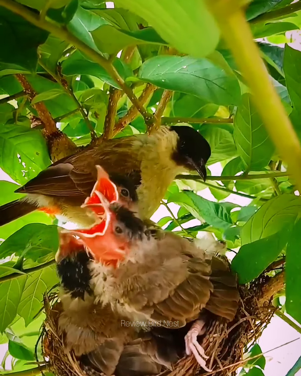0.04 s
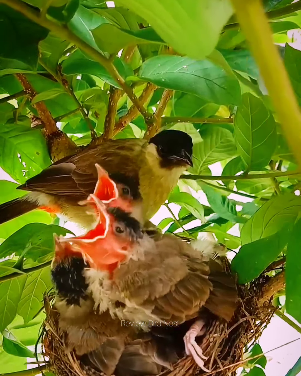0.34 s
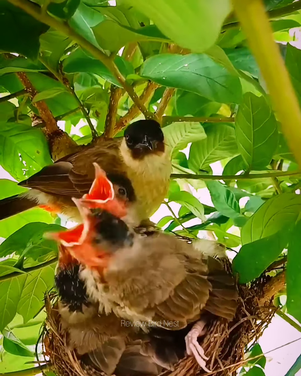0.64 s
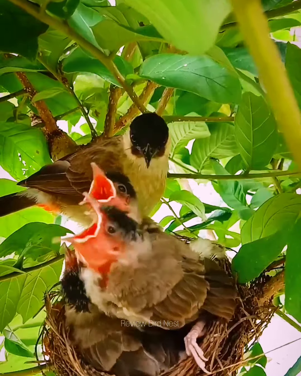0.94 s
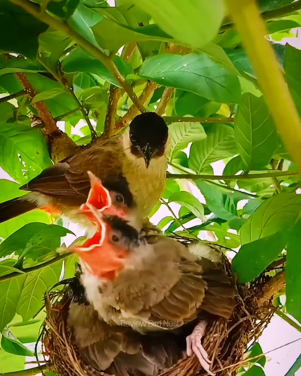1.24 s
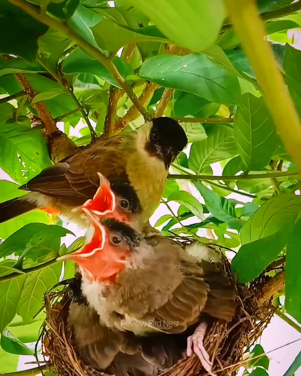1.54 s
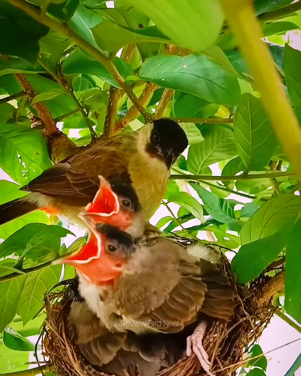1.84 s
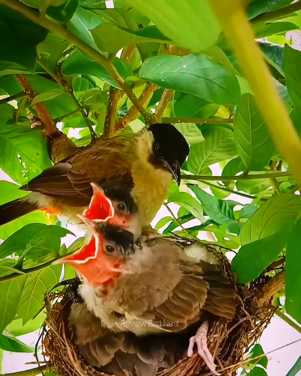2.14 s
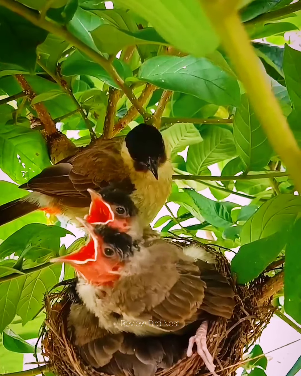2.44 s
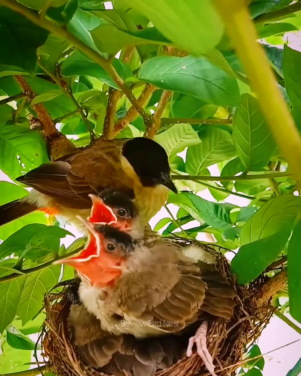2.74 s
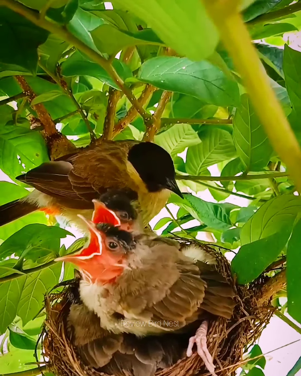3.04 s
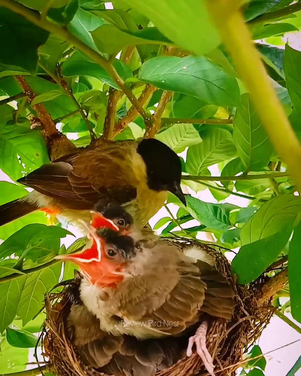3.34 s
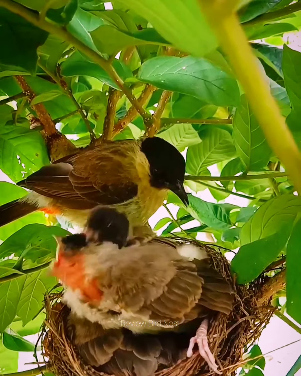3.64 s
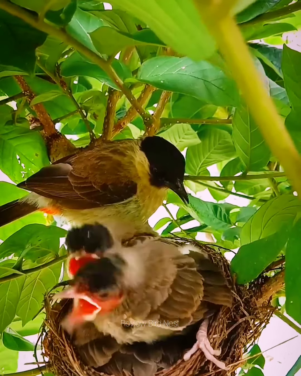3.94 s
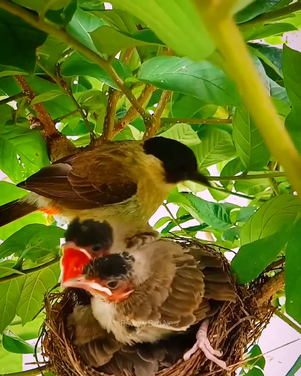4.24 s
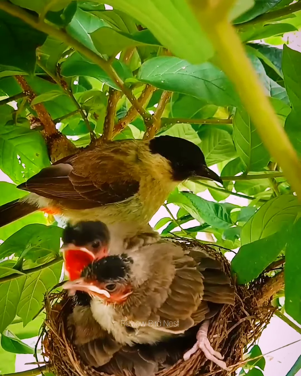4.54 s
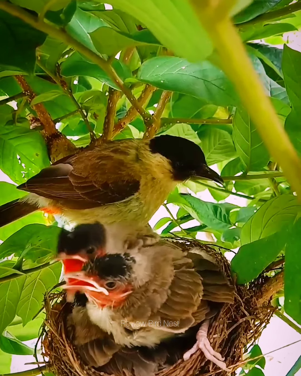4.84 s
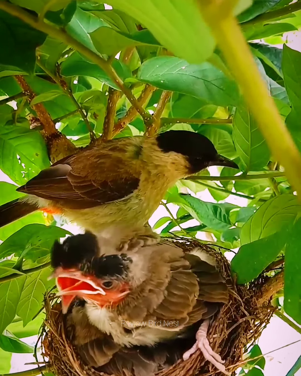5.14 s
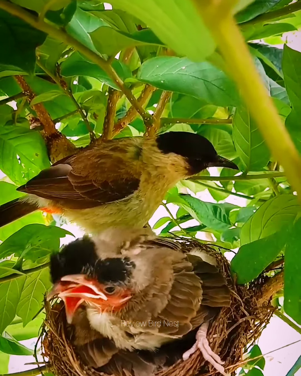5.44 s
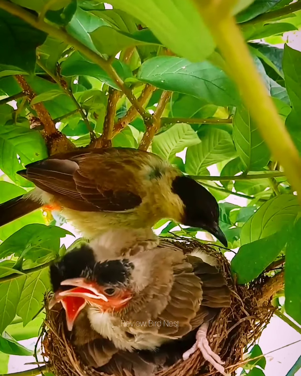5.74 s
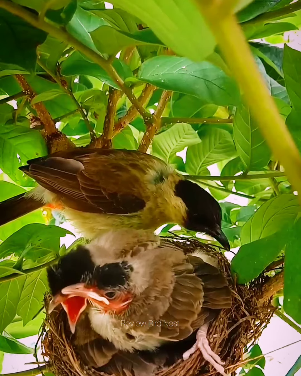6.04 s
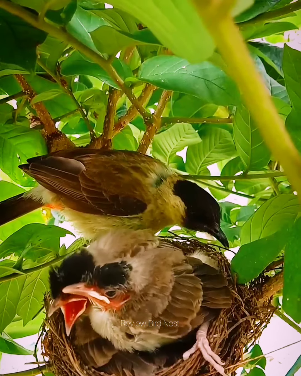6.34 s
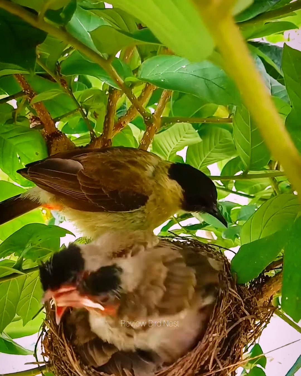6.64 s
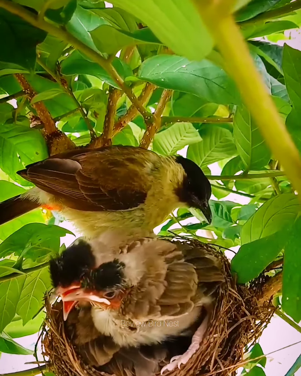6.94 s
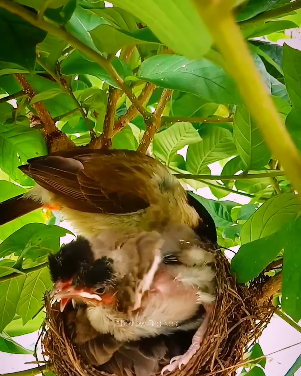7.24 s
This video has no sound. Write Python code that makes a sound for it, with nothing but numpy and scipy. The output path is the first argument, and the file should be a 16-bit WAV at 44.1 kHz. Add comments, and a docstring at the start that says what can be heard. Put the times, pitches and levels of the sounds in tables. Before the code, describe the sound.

Nestlings beg from a nest in a leafy bush, close to the microphone. About twelve short, high, squeaky calls follow one another steadily, most opening with tiny pips and a thin squeal before breaking into a fast, slightly raspy trill that sinks in pitch. The birds' movements thud softly through the branch, mostly in the first half, then settle. A steady bright hiss lies behind.

```python
"""Squeaky begging calls of nestlings, twelve overlapping rounds, close to the microphone in a leafy bush.
Most open with pips and a thin squeal, then break into a fast trill that sinks in pitch. The two sides
of the syrinx make a high and a low voice, both bright in tone and echoed by the leaves.
The birds' movements thud softly through the branch; a steady bright background hiss lies behind.
The recorder's gain control ducks on the loud calls."""
import sys
import numpy as np
from scipy import signal
from scipy.fft import rfft, irfft, next_fast_len
from scipy.io import wavfile
from scipy.ndimage import uniform_filter1d, minimum_filter1d

SR = 44100
rng = np.random.default_rng(int(sys.argv[2]) if len(sys.argv) > 2 else 0)


def wrap_up_sound(samples):
    """Save the sound to the file named by the first command line argument, as 16-bit audio."""
    columns = np.atleast_2d(samples).T
    # keep every value between -1 and 1, then stretch to whole-number steps
    tamed = np.clip(columns, -1, 1)
    steps = np.round(tamed * 32767).astype(np.int16)
    wavfile.write(sys.argv[1], SR, steps)


N = 325899
TIME = np.arange(N) / SR

# soft bumps of the birds on nest and branch: (time [s], relative level [dB])
NEST_BUMPS = [(0.177, -29), (0.261, -19.5), (0.449, -23.5), (.679, -25), (.818, -23.5), (.88, -21.5),
              (1.288, -29.5), (1.388, -17.5), (1.856, -24), (2.443, -24), (2.559, -24), (2.692, -16),
              (2.743, -21), (2.792, -22.5), (2.87, -25), (2.984, -14.5), (3.172, -22), (3.236, -21.5),
              (3.432, -22), (3.51, -28), (3.567, -24), (3.844, -26), (3.996, -30), (4.122, -31),
              (4.723, -35), (4.975, -32), (5.344, -37)]
# tone colour of the calls, bright from 3 to 7 kHz, dull above 8 kHz: (frequency [Hz], gain [dB])
VOICE_COLOUR = [(1500, -28), (2650, -14), (3050, 2.5), (3700, 3), (4350, 10), (4750, 7.5), (5400, 10.5),
                (5900, 10.5), (6600, -2.5), (7200, 6), (7900, -13.5), (8600, -28), (9350, -16),
                (10300, -33), (16000, -34)]


def from_db(db):
    """Decibels to gain."""
    return 10 ** (np.asarray(db) / 20)


def add(track, start_s, sound):
    """Mix a sound into the track from the given time."""
    at = int(start_s * SR)
    track[at:at + len(sound)] += sound[:N - at]


def coloured(x, spectrum):
    """Filter by a smooth outline of (frequency [Hz], gain [dB])."""
    hz, db = np.transpose(spectrum)
    size = next_fast_len(len(x) + 256, True)
    bin_hz = np.maximum(np.fft.rfftfreq(size, 1 / SR), 1)
    gain = from_db(np.interp(np.log(bin_hz), np.log(hz), db))
    return irfft(rfft(x, size) * gain, size)[:len(x)]


def noise(spectrum):
    """Coloured noise of rms 1."""
    x = coloured(rng.standard_normal(N), spectrum)
    return x / x.std()


def wander(size, hz):
    """Random motion up to the given rate, spread near 1."""
    knots = rng.standard_normal(1024)
    return np.interp(2 * hz * TIME[:size], np.arange(len(knots)), knots)


def background(wash_db=-31.5, waver_db=0.56, hiss_db=-31.5):
    """A distant wash that wavers a little, under a steady bright hiss."""
    # distant wash: (frequency [Hz], relative density [dB])
    wash_spectrum = [(20, -41.5), (50, -21), (120, -14.5), (300, -15), (520, -8), (680, -11), (920, -5),
                     (1080, -11.5), (1260, 0.5), (1350, -15.5), (1440, -57), (1700, -55)]
    # steady bright background hiss, dipping at 6.6 kHz and falling away above 8 kHz:
    # (frequency [Hz], relative density [dB])
    hiss_colour = [(1200, -59), (1450, -10), (1600, -3), (2300, 1.5), (3000, -1), (4300, -1), (4900, -3.5),
                   (5900, 4), (6600, -6), (7200, -1), (7950, -13), (8500, -27), (9500, -45), (14000, -44),
                   (15000, -69)]
    wash = from_db(wash_db + waver_db * wander(N, hz=2.3)) * noise(wash_spectrum)
    return wash + from_db(hiss_db) * noise(hiss_colour)


def branch_sway(jostle_db=-43, settle_from_s=2.1, settle_db_per_s=7.5, stir_db=-13, stir_db_per_s=55):
    """The branch rumbles as the nestlings jostle, then slowly settles; every bump stirs it up."""
    # rumble of the swaying branch: (frequency [Hz], relative density [dB])
    rumble_spectrum = [(20, -34.5), (50, -15.5), (90, -2), (140, -12), (200, -14.5), (270, -24), (600, -84)]
    jostle = from_db(jostle_db - settle_db_per_s * np.maximum(TIME - settle_from_s, 0))
    stirred_power = np.zeros(N)
    for start, db in NEST_BUMPS:
        add(stirred_power, start, from_db(db + stir_db - stir_db_per_s * TIME[:SR]) ** 2)
    sway = uniform_filter1d(np.sqrt(jostle ** 2 + stirred_power), size=900)
    return sway * noise(rumble_spectrum)


def branch_thuds(gain_db=-3, push_s=0.0084):
    """Soft pushes set the branch ringing, its modes a little different in strength and pitch each time."""
    # modes of the loaded branch: (frequency [Hz], relative level [dB], time to fall 60 dB [s])
    modes = [(76.2, -4.5, 0.52), (95.7, 9, 0.14), (121.4, 3.5, 0.24), (192, 4, 0.084)]
    thuds, t = np.zeros(N), TIME[:SR // 4]
    onset = 1 - np.exp(-t / push_s)
    for start, db in NEST_BUMPS:
        ring = np.zeros(len(t))
        for (hz, mode_db, t60), uneven, detune in zip(modes, *rng.standard_normal((2, len(modes)))):
            decay = from_db(mode_db + 2 * uneven - 60 * t / t60)
            ring += decay * np.sin(2 * np.pi * hz * (1 + 0.11 * detune) * t)
        add(thuds, start, from_db(db + gain_db) * onset * ring)
    return thuds


def foliage(calls, tail_db=-27, t60=0.16):
    """Near leaves send quick echoes to the microphone; farther twigs scatter a short, faint tail."""
    # reflections off the near leaves: (delay [s], level [dB])
    leaf_echoes = [(.0017, -38.5), (.0043, -12.5), (.0079, -12.5)]
    near = sum(from_db(db) * np.interp(TIME - delay, TIME, calls) for delay, db in leaf_echoes)
    t = TIME[:SR // 4]
    scatter = rng.standard_normal(len(t)) * from_db(-60 * t / t60)
    tail = signal.fftconvolve(calls, scatter / np.linalg.norm(scatter))[:N]
    return calls + near + from_db(tail_db) * tail


def envelope(size, db, swell_db, attack_s, release_s, arch_db):
    """Attack, a slightly arched hold that swells or fades evenly, release."""
    since, along = TIME[:size], np.linspace(-.5, .5, size)
    ramps = np.minimum(since / attack_s, 1) * np.minimum(since[::-1] / release_s, 1)
    hold_db = db + swell_db * along + arch_db * np.cos(2 * np.pi * along)
    return np.sin(np.pi / 2 * ramps) * from_db(hold_db)


def voiced(source):
    """Give a note the calls' bright colour and even out its loudness, keeping the fast throb."""
    note = coloured(source, VOICE_COLOUR)
    return note / np.sqrt(uniform_filter1d(note * note, size=1100) + 0.054)


def syrinx(duration_s, pitches, trill_hz, swing_hz, rough, jitter_hz=290, flutter_db=8, flutter_hz=800,
           throb=1.5, rate_spread=0.12, swing_spread=0.506, slowing=0.13, droop_hz=450, droop_s=0.00674):
    """Phase, strength and pitch sag of a gliding, trilled note; roughness scales all its random motion."""
    size = int(max(duration_s, .01) * SR)
    along, left_s = np.linspace(0, 1, size), TIME[:size][::-1]
    # the pitch droops and the trill slows as the push gives out
    arch = np.polyval(np.polyfit([0, .5, 1], pitches, 2), along)
    glide = arch - droop_hz * np.exp(-left_s / droop_s)
    rate = trill_hz * (1 - slowing * (along - .5)) * (1 + rough * rate_spread * wander(size, hz=90))
    cycle = 2 * np.pi * np.cumsum(rate) / SR
    # each swing rests on a steady low pitch, flicks up to a crest of uneven height and slides back
    crest = (1 + np.cos(cycle)) * (1 + rough * swing_spread * wander(size, hz=80))
    lean = 0.06 * np.cos(2 * cycle) - 0.1 * np.sin(2 * cycle)
    hz = glide + swing_hz * (crest + lean - 1) + rough * jitter_hz * wander(size, hz=1000)
    # the membrane is loudest at the turns of the trill and on each slide down, and flutters in between
    throb_db = 10 * swing_hz / np.mean(pitches) * (throb * np.cos(2 * cycle) + 0.7 * np.sin(cycle))
    flutter = np.tanh(wander(size, flutter_hz) + wander(size, flutter_hz / 10))
    strength = from_db(throb_db + flutter_db * rough * flutter)
    return 2 * np.pi * np.cumsum(hz) / SR, strength, glide[0] - glide


def pips(length_s=0.0068, rise_hz=1000, gain_db=3):
    """Single upward flicks of the syrinx before a call takes hold."""
    # opening pips: (time [s], relative level [dB], centre pitch [Hz])
    flicks = [(0.208, -11, 5590), (0.842, -11, 5860), (1.501, -9.5, 5700), (1.5168, -8, 5680),
              (2.194, -4.5, 5590), (2.2034, -3, 5460), (3.5492, -10, 5260), (3.938, -14.5, 6140),
              (3.9547, -24.5, 5960), (4.404, -9.5, 6120), (4.922, -14, 5860), (4.9316, -21, 6070),
              (5.508, -13.5, 5840), (6.172, -17.5, 5870), (6.187, -17, 5640)]
    voice, along = np.zeros(N), np.linspace(0, 1, int(length_s * SR))
    for start, db, hz in flicks:
        phase = 2 * np.pi * np.cumsum(hz + rise_hz * (along - .5)) / SR
        add(voice, start, from_db(db + gain_db) * np.sin(np.pi * along) ** 2 * np.sin(phase))
    return voice


def squeals(gain_db=2.0, trill_hz=100):
    """The thin high voice of the syrinx, nearly a pure tone."""
    # high notes: (start [s], end [s], first, middle and last glide pitch [Hz], swing [Hz],
    # roughness [factor], relative level [dB], swell over the note [dB])
    high_notes = [ (0.207, 0.261, 5650, 5860, 5310, 90, 0.46, -11, 4),
                  (.25, 0.338, 5380, 5740, 5790, 130, .4, -15.5, 2),
                  (0.321, 0.531, 5850, 5660, 5540, 334, 0.74, -13, -19.5),
                  (.849, 0.933, 5360, 6160, 5640, 220, .5, -8, 13.5),
                  (0.924, 1.08, 5950, 5820, 5610, 326, 0.7, -11.5, 9.5),
                  (1.104, 1.18, 5250, 5170, 5500, 150, 0.2, -23, -4),
                  (1.53, 1.556, 5660, 5920, 6100, 200, 0.8, -15, 8),
                  (1.543, 1.592, 6340, 5900, 5540, 121, 0.54, -5.5, -3),
                  (1.578, 1.736, 5540, 5730, 5360, 322, 0.64, -14.5, 1.5),
                  (2.21, 2.271, 5650, 6290, 5840, 120, 0.75, -12.5, 6),
                  (2.258, 2.419, 5770, 5790, 5650, 320, 0.67, -9.5, -2),
                  (2.887, 2.963, 5580, 5280, 5600, 232, 0.63, -21.5, 7),
                  (2.953, 3.005, 5620, 6130, 5360, 217, 0.65, -9, 10),
                  (3.007, 3.127, 5950, 5540, 5740, 480, 0.6, -13.5, -7),
                  (3.111, 3.17, 5550, 5300, 5060, 200, .4, -18.5, -17),
                  (3.552, 3.601, 6020, 6360, 5700, 120, 0.5, -6, 15.5),
                  (3.598, 3.712, 5980, 6070, 5910, 357, .3, -8.5, -1),
                  (3.723, 3.876, 5550, 5550, 5520, 227, 0.75, -21, -18.5),
                  (3.966, 4.026, 7400, 7470, 7100, 100, 0.65, -22.5, -1),
                  (3.978, 4.025, 6260, 6100, 5900, 200, 0.65, -21, 5),
                  (4.029, 4.075, 5700, 5640, 5480, 426, .45, -14, -3),
                  (4.067, 4.178, 5560, 5950, 5940, 400, 0.77, -15, -2),
                  (4.174, 4.205, 5790, 5860, 4900, 150, 0.54, -8.5, -12),
                  (4.417, 4.47, 7160, 7280, 7100, 100, 0.8, -23.5, -4),
                  (4.42, 4.526, 6040, 6100, 5870, 300, 0.94, -20.5, 8),
                  (4.637, 4.666, 5030, 5520, 5100, 100, 0.3, -16.5, 12),
                  (4.931, 4.97, 6200, 6680, 6800, 500, 1.2, -21.5, 0),
                  (4.956, 5.021, 6400, 5890, 5980, 60, 0.42, -11, -2),
                  (5.027, 5.114, 5850, 6000, 6020, 350, 0.76, -21, 6),
                  (5.513, 5.543, 6170, 7050, 6900, 450, 0.9, -20.5, 7),
                  (5.535, 5.575, 6280, 5860, 5270, 89, 0.5, -9.5, -16),
                  (5.589, 5.71, 5860, 5900, 5720, 130, 0.43, -14, 16),
                  (5.802, 5.832, 6020, 5020, 4440, 300, 0.65, -19, 6),
                  (6.188, 6.213, 6740, 7060, 6840, 250, 1.1, -22, 7),
                  (6.211, 6.233, 6300, 5710, 5100, 30, 0.2, -7, -10),
                  (6.347, 6.379, 5460, 5070, 4570, 400, 0.54, -18, -3),
                  (6.715, 6.77, 6500, 6970, 6700, 200, 1.23, -24, 12),
                  (6.755, 6.79, 6400, 5410, 5570, 30, .13, -18, -13)]
    voice = np.zeros(N)
    for start, end, *pitches, swing_hz, rough, db, swell_db in high_notes:
        phase, strength, _ = syrinx(
            end - start, pitches, trill_hz, swing_hz, rough, jitter_hz=330,
            flutter_db=9.5, flutter_hz=455, throb=1.0, rate_spread=0.11, swing_spread=0.42)
        note = voiced(strength * np.sin(phase))
        shape = envelope(len(note), db + gain_db, swell_db, attack_s=0.0035, release_s=0.0052,
                         arch_db=0.1)
        add(voice, start, note * shape)
    return voice


def trills(gain_db=0.5, doubling_db=-5, slack_hz=700, third_db=-9, fourth_db=-12, undertone_db=-4):
    """The low voice of the syrinx with its overtones; also how hoarse it is."""
    # low notes: (start [s], end [s], first, middle and last glide pitch [Hz], trill rate [Hz],
    # swing [Hz], roughness [factor], relative level [dB], swell over the note [dB], overtone [dB])
    low_notes = [ (0.243, 0.352, 4170, 4030, 3890, 110, 14, 0.18, -11.5, 18, -10),
                 (0.338, 0.53, 4050, 3494, 3000, 63, 296, 0.48, -12, -6.5, -11),
                 (0.853, 0.945, 4450, 4120, 3850, 65, 86, 0.55, -17.5, 19, -18),
                 (0.906, 1.075, 3855, 3700, 3730, 63, 360, 0.48, -12, 7, -24),
                 (.93, 1.052, 4080, 3980, 3770, 96, 14, 0.18, -14, -1, -22),
                 (1.034, 1.186, 3780, 3340, 3080, 59, 380, 0.48, -16, -4.5, -20),
                 (1.536, 1.608, 3950, 3910, 3840, 77, 120, 0.47, -18, 4, -17),
                 (1.586, 1.709, 3910, 3800, 3680, 112, 443, 0.48, -15, -7, -16),
                 (1.684, 1.828, 3640, 3543, 3030, 66, 280, 0.28, -13, -6, -10),
                 (2.222, 2.285, 4140, 4230, 4000, 87, 80, 0.54, -19, 16, -5),
                 (2.253, 2.397, 3954, 3756, 3550, 90, 495, 0.42, -10, -1, -15),
                 (2.354, 2.497, 3704, 3456, 3295, 62, 255, 0.34, -12, -4.5, -7.5),
                 (2.95, 3.006, 4000, 4000, 3900, 93, 90, 0.56, -18.5, 13, -14),
                 (2.983, 3.119, 3830, 3705, 3630, 71, 480, 0.32, -9, 0, -12),
                 (3.02, 3.167, 3950, 3660, 3385, 74, 290, 0.15, -10.5, -8, -9.5),
                 (3.545, 3.612, 4370, 3990, 3550, 86, 72, 0.37, -19, 21, -10),
                 (3.583, 3.739, 3670, 3506, 3966, 93, 485, 0.22, -9, -4.5, -2.5),
                 (3.707, 3.875, 4380, 3610, 3490, 110, 400, 0.44, -25, -5, -5.5),
                 (4.018, 4.16, 4740, 4310, 4360, 85, 570, 0.33, -17, -12, 0),
                 (4.059, 4.203, 4160, 3970, 3920, 95, 650, 0.5, -16.5, -7, -3),
                 (4.443, 4.522, 4400, 4350, 4560, 100, 180, 0.62, -21.5, 6, 6),
                 (4.484, 4.66, 4420, 3856, 3420, 78, 495, 0.33, -9.5, -4.5, -5.5),
                 (4.945, 5.016, 4650, 4270, 4070, 97, 44, 0.65, -11.5, 7, 0),
                 (4.989, 5.124, 4027, 3680, 3430, 60, 520, 0.4, -7, 3, -4.5),
                 (5.054, 5.186, 3730, 3600, 3220, 80, 286, 0.24, -9.5, -4, -4),
                 (5.521, 5.59, 4250, 3790, 3310, 87, 120, 0.65, -16.5, 7, 1),
                 (5.563, 5.731, 3680, 3268, 3840, 79, 403, 0.26, -7, -10, -3),
                 (5.697, 5.826, 4030, 3410, 3380, 79, 240, 0.42, -14, -9, -6),
                 (6.197, 6.254, 4330, 3760, 3460, 80, 43, 0.55, -13, 23, -3),
                 (6.224, 6.362, 3460, 3444, 3850, 68, 470, 0.26, -5, 0, 0.5),
                 (6.746, 6.8, 4320, 3670, 3460, 110, 27, 0.58, -13.5, 14, 1),
                 (6.773, 6.917, 3570, 3416, 3786, 69, 500, 0.25, -4.5, -10, 3.5),
                 (6.882, 6.953, 3850, 3420, 3110, 51, 370, 0.16, -19, 4, -7)]
    voice, hoarseness = np.zeros((2, N))
    for start, end, *pitches, trill_hz, swing_hz, rough, db, swell_db, overtone_db in low_notes:
        phase, strength, sag_hz = syrinx(end - start, pitches, trill_hz, swing_hz, rough)
        # as the membrane slackens its period doubles: a partial grows between the first two harmonics
        doubling = from_db(doubling_db) * np.clip(sag_hz / slack_hz, 0, 1)
        overtones = from_db(overtone_db) * (np.sin(2 * phase) + doubling * np.sin(3 / 2 * phase))
        # the highest harmonics swell in the middle of the note, where the push is hardest
        push = from_db(overtone_db / 2) * 2 * np.hanning(len(phase))
        edge = from_db(third_db) * np.sin(3 * phase) + from_db(fourth_db) * np.sin(4 * phase)
        # rough notes also growl faintly an octave down
        undertone = rough * from_db(undertone_db) * np.sin(phase / 2)
        note = voiced(strength * (np.sin(phase) + overtones + push * edge + undertone))
        shape = envelope(len(note), db + gain_db, swell_db, attack_s=0.013, release_s=0.022,
                         arch_db=1.08)
        add(voice, start, note * shape)
        add(hoarseness, start, rough * np.sqrt(push) * strength)
    return voice, hoarseness


def nestlings(rasp_db=-10.5, sum_tone_db=-6):
    """The two sides of the syrinx sound together and modulate each other, adding a faint sum tone."""
    # breathy turbulence in the calls: (frequency [Hz], relative density [dB])
    rasp_spectrum = [(1500, -33), (2200, 1), (2900, -0.5), (4200, -16), (4900, 1.5), (5500, -10), (5900, 5),
                     (6500, 6.5), (7300, 4), (8000, -5.5), (8600, -25), (9400, -22.5), (11000, -31),
                     (15000, -29)]
    low, hoarseness = trills()
    high = squeals()
    voice = low + high + from_db(sum_tone_db) * coloured(low * high, VOICE_COLOUR)
    # hoarse notes carry turbulence that follows the strength of the voice
    flow = np.sqrt(np.abs(uniform_filter1d(voice ** 2, size=200)))
    return voice + from_db(rasp_db) * hoarseness * flow * noise(rasp_spectrum)


def scene():
    """One microphone by the nest feeds both channels alike."""
    mono = foliage(nestlings() + pips()) + branch_thuds() + background() + branch_sway()
    return np.array([mono, mono])


def record(dry, threshold_db=-19, squeeze=0.49, quick_db_per_s=48, lingering=0.68, slow_db_per_s=12,
           ceiling=0.88, cutoff_hz=15700):
    """The recorder ducks on loud calls, lets go quickly and then slowly, limits peaks and cuts the top."""
    level_db = 10 * np.log10(np.abs(uniform_filter1d(dry[0] ** 2, size=500)) + 1e-12)
    duck_db = squeeze * np.maximum(level_db - threshold_db, 0)
    quick = np.maximum.accumulate(duck_db + quick_db_per_s * TIME) - quick_db_per_s * TIME
    slow = np.maximum.accumulate(lingering * duck_db + slow_db_per_s * TIME) - slow_db_per_s * TIME
    ducked = dry * from_db(-uniform_filter1d(np.maximum(quick, slow), size=180))
    limiter_gain = ceiling / np.maximum(np.abs(ducked[0]), ceiling)
    limited = ducked * uniform_filter1d(minimum_filter1d(limiter_gain, size=129), size=129)
    return signal.sosfilt(signal.cheby2(12, 70, cutoff_hz, fs=SR, output="sos"), limited)


dry = scene()
out = record(dry)
wrap_up_sound(out)
```